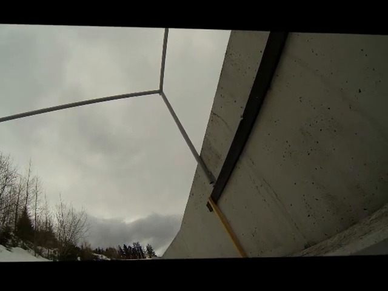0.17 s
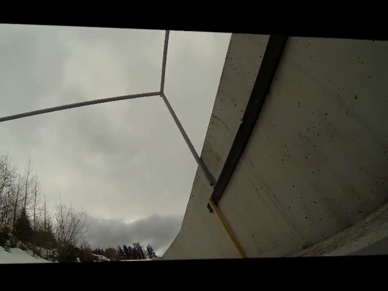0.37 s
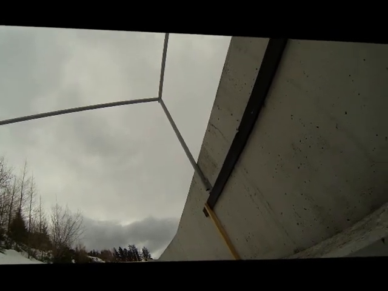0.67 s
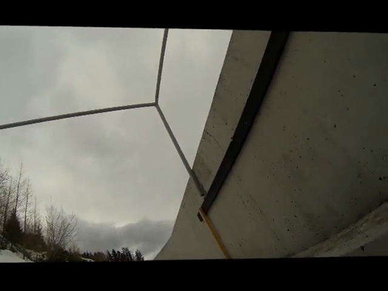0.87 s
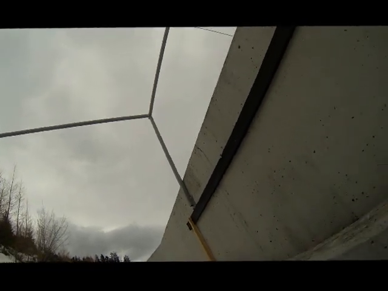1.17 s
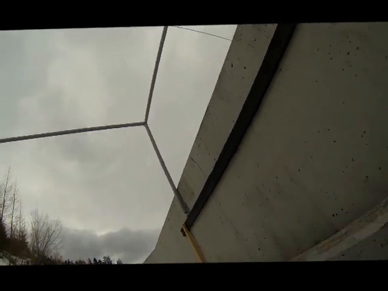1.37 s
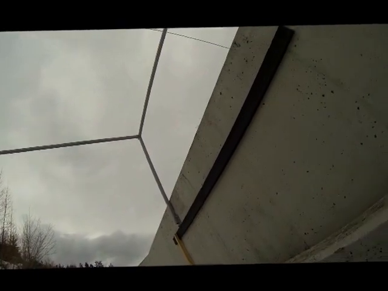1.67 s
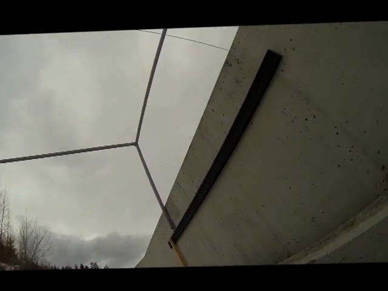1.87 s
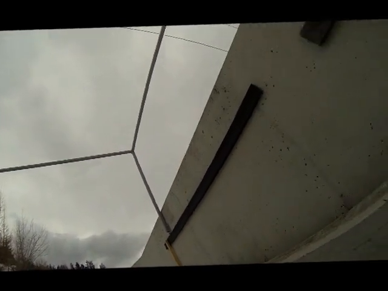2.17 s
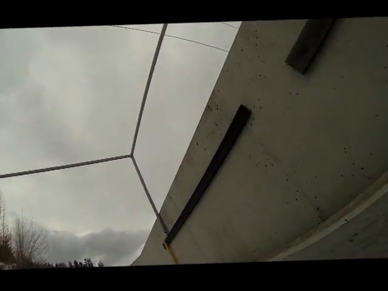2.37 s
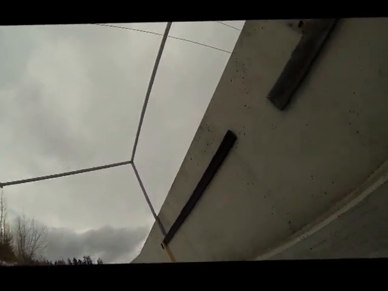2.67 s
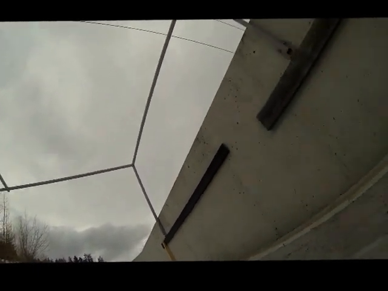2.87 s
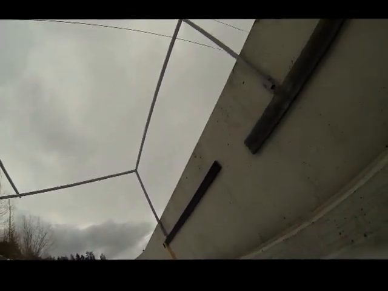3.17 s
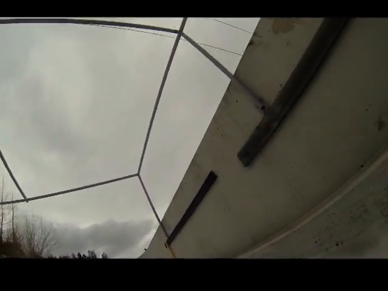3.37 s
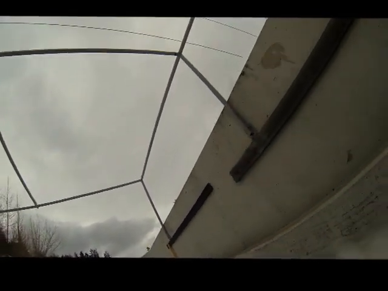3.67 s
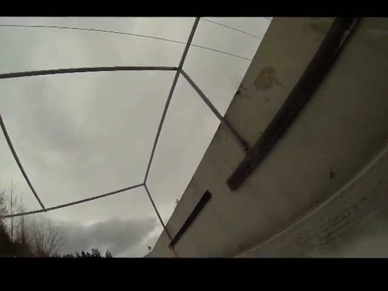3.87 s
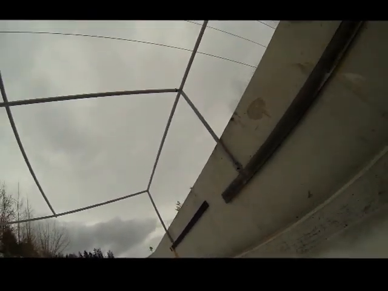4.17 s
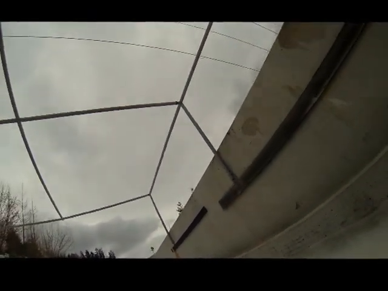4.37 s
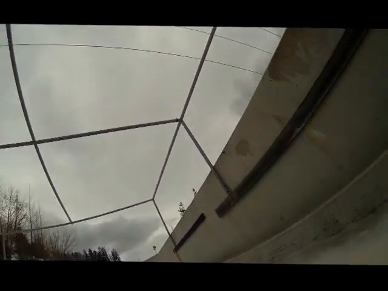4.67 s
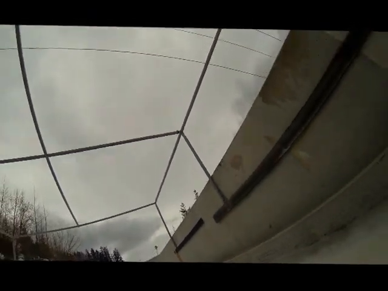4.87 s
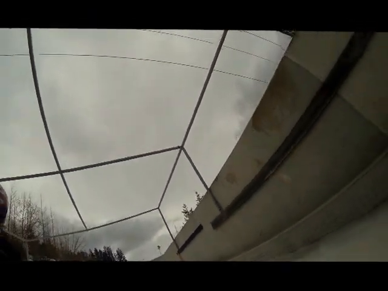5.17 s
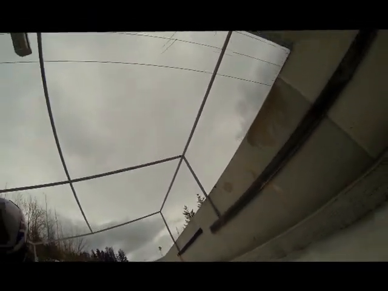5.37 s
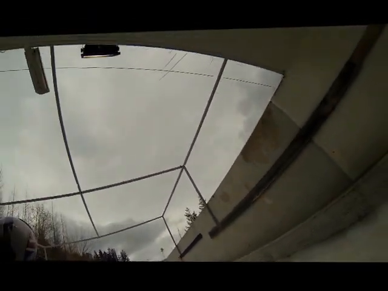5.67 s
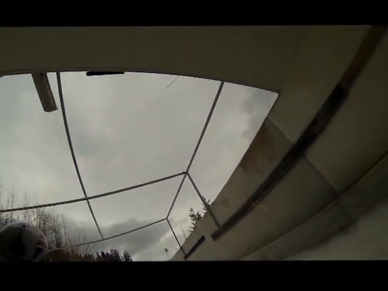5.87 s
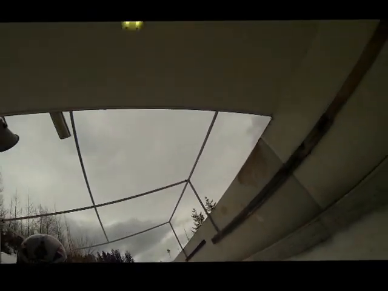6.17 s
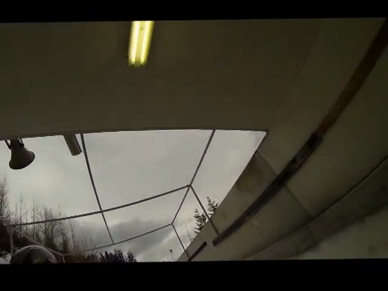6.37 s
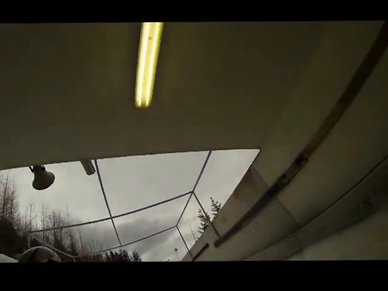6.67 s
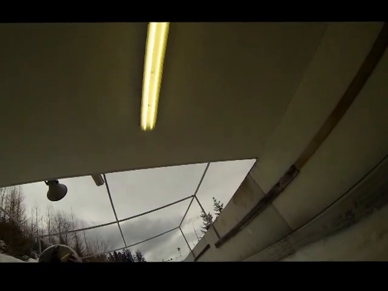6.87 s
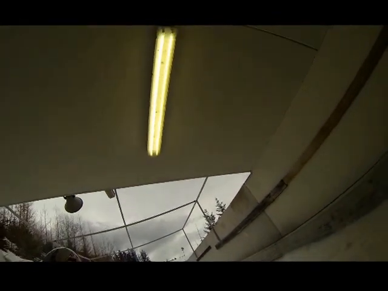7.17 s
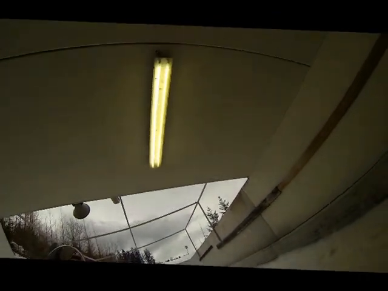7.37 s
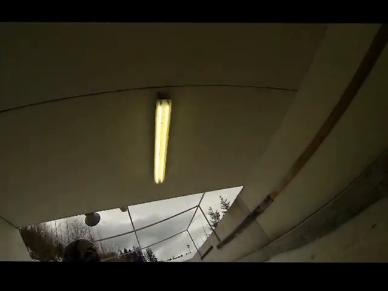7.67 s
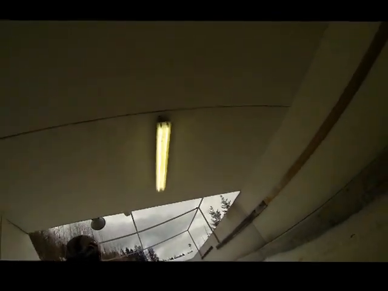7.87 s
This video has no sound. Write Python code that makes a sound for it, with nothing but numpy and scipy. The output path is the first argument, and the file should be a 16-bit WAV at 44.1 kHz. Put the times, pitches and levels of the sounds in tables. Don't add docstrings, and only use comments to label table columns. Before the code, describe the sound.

Deep shuddering rumble and hard low thumps of a speeding sled on ice, with scraping runners, clicky rattles and a faint high whine in lulls.

```python
import sys
import numpy as np
from scipy import signal
from scipy.io import wavfile
from scipy.ndimage import uniform_filter1d

SR = 44100
rng = np.random.default_rng(int(sys.argv[2]) if len(sys.argv) > 2 else 0)


def persist_wave(psi):
    counts = np.round(np.clip(psi, -1, 1) * 32767).astype(np.int16)
    wavfile.write(sys.argv[1], SR, np.atleast_2d(counts).T)


def convert_level_to_amplitude(level_db):
    exponent = np.asarray(level_db, float) / 20
    return 10 ** exponent


N = 354255
TIME = np.arange(N) / SR


def unit(x):
    return x / np.sqrt(np.mean(x ** 2))


def walk(rate):
    hold = int(SR / rate)
    levels = np.repeat(rng.standard_normal(N // hold + 1), hold)
    return unit(uniform_filter1d(uniform_filter1d(levels, hold), hold)[:N])


def body(x, modes, count=2):
    out = 0
    for k, (hz, width, db) in enumerate(modes):
        b, a = signal.iirpeak(hz, hz / width, fs=SR)
        ringing = signal.sosfilt([[*b, *a]] * count, x)
        out = out + (-1) ** k * convert_level_to_amplitude(db) * ringing / np.sqrt(width)
    return out


def steadied(x, seconds, share):
    swell = uniform_filter1d(x ** 2, int(seconds * SR)) + 1e-12
    return unit(x / swell ** (np.clip(share, 0, 1) / 2))


def grit(rate, spread_db, smooth):
    hit = rng.random(N) < rate / SR
    size = np.minimum(rng.exponential(size=N), 3.5)
    rub = rng.standard_normal(N)
    return unit(hit * convert_level_to_amplitude(spread_db * size) * np.sign(rub)) + smooth * rub


def swells(rows, rise_db_s, fall_db_s, floor_db):
    start, end, db = np.transpose(rows)[:, :, None]
    t = TIME[::128]
    lost = rise_db_s * np.maximum(start - t, 0) + fall_db_s * np.maximum(t - end, 0)
    power = convert_level_to_amplitude(2 * floor_db) + convert_level_to_amplitude(2 * (db - lost)).sum(axis=0)
    return np.interp(TIME, t, 10 * np.log10(power))


def rings(table, rise_s, fall_s):
    out = np.zeros(N)
    for s, db, hz in table:
        near = slice(max(int((s - .08) * SR), 0), int((s + .3) * SR))
        age = TIME[near] - s
        swell = np.exp(-np.where(age < 0, (age / rise_s) ** 2, age / fall_s))
        out[near] += convert_level_to_amplitude(db) * swell * np.sin(2 * np.pi * hz * age)
    return out


def strikes(table, shape):
    out = np.zeros(N)
    for s, db, *_ in table:
        out[int(s * SR)] += convert_level_to_amplitude(db)
    return signal.fftconvolve(out, shape)[:N]


# pitch in Hz, level in dB.
WHINE = [(10643, -2), (10691, -8), (10740, -19)]
# start in seconds, end in seconds, whine level in dB.
LULLS = [(0, .7, -78), (1.95, 2.35, -81), (2.8, 2.84, -90), (3.42, 3.68, -78), (3.88, 3.91, -86.5),
         (4.15, 4.18, -87), (4.45, 4.61, -83), (5.25, 5.36, -82.5), (6.0, 6.22, -84.5), (6.5, 6.63, -80),
         (6.8, 6.88, -83), (7.45, 7.58, -90), (8.0, 8.03, -99)]


def electronics():
    whine = sum(convert_level_to_amplitude(db) * np.sqrt(2) * np.sin(2 * np.pi * hz * TIME) for hz, db in WHINE)
    hiss_bands = [(7900, 3000, -1.5), (11500, 3000, -8.0), (14200, 3000, -11.5)]
    hiss = unit(body(rng.standard_normal(N), hiss_bands)) * convert_level_to_amplitude(3.0 * walk(25))
    gain_db = swells(LULLS, rise_db_s=35.5, fall_db_s=401, floor_db=-99)
    return convert_level_to_amplitude(gain_db) * (whine + convert_level_to_amplitude(2.0) * hiss)


# time in seconds, level in dB.
SWAY = [(0, -17.5), (.15, -23.5), (.4, -34), (.76, -14.5), (.96, -22), (1.59, -15.5), (1.88, -22.5),
        (2.65, -28.5), (4.0, -35.5), (4.61, -16.5), (4.83, -24), (5.05, -14), (5.39, -24.5), (5.9, -16.5),
        (6.37, -22.5), (7.1, -20), (7.42, -14), (7.52, -29)]
# time in seconds, level in dB.
BOUNCES = [(2.06, -12.5), (2.35, -15), (2.52, -18.5), (2.78, -15.5), (3.06, -15.5), (3.409, -13),
           (3.62, -13.5), (3.84, -15.5), (4.119, -16.5), (4.88, -14.5), (6.51, -16.5), (6.71, -16.5),
           (7.57, -15), (7.69, -21.5), (8.03, -21)]


def sway():
    sway_hz = 35.43 * (1 + 0.05115 * walk(7.9))
    phase = 2 * np.pi * np.cumsum(sway_hz) / SR + 1.4
    buffet = unit(body(rng.standard_normal(N), [(21.6, 25, 0.21), (48.0, 19, -1.2)]))
    sway_db = np.interp(TIME, *np.transpose(SWAY))
    bounce_db = swells([(s, s, db) for s, db in BOUNCES], rise_db_s=170.5, fall_db_s=107.5, floor_db=-58)
    return np.hypot(convert_level_to_amplitude(sway_db), convert_level_to_amplitude(bounce_db)) * (np.sqrt(2) * np.sin(phase) + convert_level_to_amplitude(-6.5) * buffet)


# pitch in Hz, width in Hz, level in dB.
RING = [(156, 10.8, -2), (168.2, 34, -12)]
LOWER_PANELS = [(69.4, 35.6, 0), (101.4, 19, -8.5), (123.1, 28.4, -0.5)]
UPPER_PANELS = [(205.6, 37, 1), (243.8, 21, -1.5), (282.5, 40, -5)]
# time in seconds, main ring in dB, lower panels in dB.
JOLTS = [(.02, -23, -21), (0.132, -17.5, -15.5), (.69, -26, -17.5), (0.941, -15, -33.5), (1.431, -28, -17),
         (1.968, -18, -14), (2.17, -11.5, -16), (2.352, -21.5, -11), (2.552, -20.5, -18.5),
         (2.838, -15.5, -12.5), (3.131, -19, -11), (3.69, -19, -12), (3.779, -23.5, -35),
         (3.909, -27, -16.5), (4.158, -17, -9.5), (4.472, -15.5, -15.5), (4.811, -20.5, -32),
         (4.899, -36.5, -21.5), (5.342, -21.5, -12.5), (5.43, -20.5, -45), (5.572, -16.5, -10),
         (5.77, -16.5, -21), (5.93, -19.5, -18.5), (6.238, -18.5, -22), (6.618, -15, -18),
         (6.8, -12.5, -22), (7.27, -20, -22), (7.561, -17, -10.5), (7.848, -14, -15), (8.03, -33, -17.5)]
# start in seconds, end in seconds, main ring in dB, lower panels in dB.
ROUGH = [(0.19, 0.387, -29, -28), (.42, 0.59, -34.5, -34.5), (0.77, 0.923, -25.5, -20.5),
         (0.988, 1.452, -24, -20.5), (1.544, 1.906, -32, -34), (2.073, 2.15, -26, -25),
         (2.58, 2.81, -23.5, -23), (3.006, 3.08, -36, -29), (3.235, 3.636, -30.5, -30),
         (3.97, 4.114, -30.5, -32.5), (4.514, 4.808, -22.5, -23.5), (4.958, 5.181, -29.5, -27.5),
         (6.016, 6.21, -21.5, -22), (6.29, 6.426, -34.5, -31), (6.658, 6.93, -28.5, -22.5),
         (6.99, 7.124, -31, -28), (7.392, 7.525, -25, -26), (7.66, 7.78, -37, -31.5)]


def hull():
    smooth_ice_db = -45
    shakes = np.array([(s, s, *db) for s, *db in JOLTS] + ROUGH)
    ring_db = swells(shakes[:, [0, 1, 2]], 330.5, 176.5, smooth_ice_db)
    lower_db = swells(shakes[:, [0, 1, 3]], 329.5, 253.5, smooth_ice_db)
    upper_db = 0.29 * ring_db + 0.43 * lower_db - 21.5
    edge_db = 1.03 * lower_db - 32
    ring = steadied(body(grit(60, 3.0, 0.43), RING), .03, 0.4)
    lower = steadied(body(grit(40, 2.2, 0.35), LOWER_PANELS), 0.051, 1.0)
    upper = steadied(body(grit(80, 4.5, 0.41), UPPER_PANELS), 0.02, 0.24)
    edge = unit(body(grit(80, 3.5, .6), [(372, 510, -2.5), (615, 990, -4.0)]))
    panels = convert_level_to_amplitude(lower_db - 2.5) * lower + convert_level_to_amplitude(upper_db) * upper
    return convert_level_to_amplitude(ring_db + 0.5) * ring + panels + convert_level_to_amplitude(edge_db) * edge


# pitch in Hz, width in Hz, level in dB.
MOUNT = [(343, 150, -1), (625, 110, -4), (800, 85, 1)]
CAVITY = [(1020, 566, -2.9), (1317, 110, -0.69), (1436, 190, -1.8), (1663, 327, 1.5)]
WALL = [(2235, 570, -2.5), (2767, 640, 1.5), (3444, 540, -4.5), (4080, 1500, -10)]
SNAP = [(4750, 1200, -2.5), (6200, 1300, -7.5), (7920, 1100, -12), (10000, 2500, -16), (13000, 2500, -25)]
# start in seconds, end in seconds, cavity level in dB,
# wall minus cavity in dB.
RUBS = [(0, -0.003, -44.5, -14), (0.124, 0.167, -43, -8.5), (0.291, 0.41, -41.5, -13),
        (0.43, 0.632, -46.5, -9.5), (0.657, 0.748, -38, -12.5), (.78, .88, -42, -12), (.9, 1.02, -48, -13),
        (1.05, 1.47, -45.5, -12.5), (1.494, 1.76, -50, -13), (1.906, 1.976, -44.5, -9),
        (2.01, 2.192, -47, -9), (2.289, 2.347, -50.5, -7.5), (2.543, 2.637, -50.5, -16),
        (2.76, 2.829, -43, -12), (3.057, 3.127, -51.5, -7.5), (3.235, 3.42, -43.5, -15),
        (3.45, 3.53, -45, -10), (3.57, 3.65, -45, -10), (3.68, 3.678, -38.5, -20), (3.87, 3.914, -45, -6.5),
        (4.129, 4.153, -38, -12.5), (4.376, 4.895, -45.5, -16.5), (4.948, 5.185, -52.5, -10),
        (5.505, 5.66, -50, -11), (5.773, 5.942, -54, -7), (6.05, 6.241, -44, -10.5),
        (6.25, 6.304, -55, -12), (6.363, 6.43, -53, -10), (6.544, 6.87, -42, -10.5),
        (6.987, 7.36, -49.5, -9.5), (7.43, 7.64, -42.5, -14), (7.68, 7.977, -52.5, -10.5),
        (8.02, 8.034, -49, -12)]


def scrape():
    rise_db_s, fall_db_s, glide_db, glide_wall_db = 159, 260.5, -60.5, -9.5
    cavity_rows = [(a, b, db) for a, b, db, _ in RUBS]
    wall_rows = [(a, b, db + rel) for a, b, db, rel in RUBS]
    cavity_db = swells(cavity_rows, rise_db_s, fall_db_s, glide_db)
    wall_db = swells(wall_rows, rise_db_s, fall_db_s, glide_db + glide_wall_db) - cavity_db
    judder_db = 2.0 * walk(40)
    chips = grit(300, 1.6, 1.0)
    ticks = grit(120, 2.8, 1.7)
    mount = convert_level_to_amplitude(-15.5 + 3.6 * walk(20)) * unit(body(chips, MOUNT))
    wander_db = 3.0 * walk(30)
    cavity = 0
    for k, mode in enumerate(CAVITY):
        cavity = cavity + (-1) ** k * convert_level_to_amplitude(np.roll(wander_db, k * SR)) * body(chips, [mode])
    wall = convert_level_to_amplitude(wall_db - 3.0 + wander_db[::-1]) * unit(body(chips + 1.3 * ticks, WALL))
    spray = convert_level_to_amplitude(wall_db - 13.0 + 2.6 * walk(15)) * unit(body(ticks, SNAP))
    air_rush = convert_level_to_amplitude(-79.5) * unit(body(ticks, WALL + SNAP))
    return convert_level_to_amplitude(cavity_db + judder_db) * (mount + unit(cavity) + wall + spray) + air_rush


# time of the top in seconds, cavity level in dB,
# wall minus cavity in dB, length in milliseconds.
SKIDS = [
    (1.969, -22, -18, 8),
    (1.99, -37.5, -24.5, 21),
    (4.371, -33.5, -7.5, 17),
    (5.372, -32.5, -18, 5.3),
    (6.482, -36, -4.5, 21.7),
]


def skids():
    rub = rng.standard_normal(N)
    cavity, wall, snap = (unit(body(rub, modes)) for modes in (CAVITY[2:], WALL, SNAP))
    out = np.zeros(N)
    for s, db, wall_db, ms in SKIDS:
        near = slice(int((s - .1) * SR), int((s + 0.11) * SR))
        age = (TIME[near] - s) * 1000 / ms
        swell = np.exp(-np.where(age < 0, (1.24 * age) ** 2, age))
        bright = wall[near] + convert_level_to_amplitude(-14.0) * snap[near]
        out[near] += convert_level_to_amplitude(db) * swell * (cavity[near] + convert_level_to_amplitude(wall_db) * bright)
    return out


# start in seconds, end in seconds, level in dB.
BITES = [(.03, .19, -60), (.275, .405, -51), (.428, .452, -47), (.8, .87, -60), (1.895, 1.945, -51),
         (2.255, 2.3, -59), (2.705, 2.748, -54), (2.77, 2.848, -55), (3.37, 3.43, -49), (3.443, 3.47, -48),
         (3.485, 3.53, -45), (3.56, 3.6, -54), (3.612, 3.648, -50), (4.35, 4.39, -53), (6.445, 6.5, -54),
         (7.53, 7.545, -52)]


def bites():
    spray = grit(900, 2.5, .8)
    wall = convert_level_to_amplitude(2.5 * walk(60)) * unit(body(spray, WALL))
    snap = convert_level_to_amplitude(2.0 * walk(45)) * unit(body(spray, SNAP))
    level_db = swells(BITES, rise_db_s=900, fall_db_s=1500, floor_db=-99)
    return convert_level_to_amplitude(level_db) * (wall + convert_level_to_amplitude(-10) * snap)


# time of the top in seconds, peak level in dB, pitch in Hz. Mostly
# large panels swung by ruts; the rows near 258 and 273 Hz are small panels.
LUMPS = [(0.978, -18.5, 110.4), (1.13, -13, 78.3), (1.56, -19, 116.2), (2.08, -15, 114.5),
         (2.62, -10, 125.8), (3.139, -11.5, 113.4), (3.93, -20, 108), (4.145, -10, 114.7),
         (4.622, -13, 129.4), (3.3, -31.5, 273), (7.002, -15.5, 163.2), (7.01, -31, 257.7),
         (7.091, -30, 147)]
NUDGES = [(.03, -29, 250), (.17, -27, 245), (.284, -28, 262), (.349, -33, 275), (.484, -33, 275),
          (1.22, -25, 245), (1.35, -27, 240), (3.063, -41, 300), (3.18, -25, 240), (3.243, -28, 250),
          (3.327, -30, 238), (4.37, -37, 250), (6.1, -26, 240), (7.393, -27, 250)]
JERKS = [(2.55, -27, 350), (2.844, -32, 430), (3.115, -28, 320), (3.911, -24, 344), (4.466, -30, 380),
         (6.214, -29, 410), (6.815, -38, 425), (6.879, -32, 375), (7.56, -28, 450), (7.852, -34, 394)]
BRACKET_TAPS = [(.03, -40, 790), (.281, -35, 800), (.335, -41, 800), (.39, -43, 520), (.7, -36, 790),
                (1.096, -42, 560), (1.125, -40, 800), (1.194, -44, 560), (1.215, -43, 1030),
                (1.287, -45, 580), (1.748, -43, 1080), (1.967, -41, 770), (2.101, -43, 800),
                (2.332, -39, 800), (2.359, -41, 820), (2.538, -44, 690), (3.58, -43, 800),
                (3.691, -42, 600), (4.164, -36, 780), (5.349, -38, 560), (5.564, -42, 830),
                (5.915, -42, 790), (6.094, -42, 800), (6.211, -35, 790), (6.217, -38, 1140),
                (6.37, -43, 810), (6.621, -38, 1090), (6.663, -42, 970), (6.735, -41, 810),
                (6.777, -41, 630), (6.813, -41, 800), (7.0, -43, 620), (7.2, -44, 600), (7.387, -28, 780)]
CASE_TAPS = [(.276, -26, 1600), (1.445, -35, 1490), (1.747, -33, 1500), (1.9, -34, 1610),
             (1.966, -13.5, 1690), (1.98, -30, 2050), (1.999, -33, 1610), (2.355, -29, 1580),
             (2.746, -34, 1610), (2.778, -33, 1420), (2.792, -33, 1690), (3.332, -34, 1630),
             (3.348, -34, 1420), (3.396, -36, 1700), (3.524, -35, 1550), (3.654, -36, 1830),
             (3.68, -32, 1390), (3.911, -38, 1750), (4.372, -27, 1610), (5.372, -25, 2800),
             (5.373, -23, 1280), (5.378, -28, 2750), (5.378, -37, 4800), (5.378, -21, 1720),
             (5.882, -35, 1630), (5.916, -26, 1410), (6.07, -31, 1300), (6.214, -34, 1700),
             (6.495, -36, 1860), (6.62, -30, 1600), (6.687, -35, 1560), (6.729, -32, 1300),
             (6.751, -29, 1310), (6.797, -35, 1280), (7.362, -32, 1360), (7.386, -20, 1360),
             (7.424, -27, 1700), (7.444, -25, 1560), (7.634, -29, 1600)]


def lumps():
    panels = rings(LUMPS, .016, .035) + rings(NUDGES, .012, .022)
    mount = rings(JERKS, .0018, .0035)
    bracket = convert_level_to_amplitude(-1.5) * rings(BRACKET_TAPS, .004, .009)
    case = convert_level_to_amplitude(-2.5) * rings(CASE_TAPS, .0015, .006)
    return panels + mount + bracket + case


# time in seconds, peak level in dB, wall minus peak in dB,
# chatter in milliseconds.
KNOCKS = [(0.0246, -27.5, -15, 7), (0.2735, -16.5, -13, 6.1), (0.6877, -29, -14.5, 20),
          (1.1252, -22, -30, 6.8), (2.0477, -24.5, -14.5, 2.2), (2.1594, -28.5, -12.5, 3.3),
          (2.3525, -18, -14.5, 3.1), (2.7046, -31, -9.5, 7.5), (2.7418, -29, -6, 4.1),
          (2.773, -32, -27, 38), (3.111, -21, -15.5, 9.5), (3.6501, -22.5, -27, 5.4),
          (4.1414, -28, -28, 5.7), (5.3472, -18.5, -18.5, 4.2), (5.3690, -15, -17, 8.7),
          (5.9128, -23, -12, 5.4), (6.1821, -25.5, -27.5, 4.8), (6.4718, -27.5, -2.5, 2.9),
          (6.616, -18, -14, 3.3), (6.7476, -32, -30, 5.6), (7.2509, -35.5, -7, 5), (7.3255, -37.5, -6, 18),
          (7.3826, -9, -21.5, 5.2), (7.4196, -11.5, -35, 2.4), (7.44, -16, -20, 7),
          (7.5344, -25.5, -11, 4.3), (7.5763, -20.5, -12.5, 6.9), (7.6003, -25, -9, 3.3),
          (7.6306, -20, -20, 11.5), (7.8481, -45, 6, 2.7)]
# time in seconds, peak level in dB.
RATTLES = [(0.093, -34.5), (0.226, -32), (0.332, -25.5), (1.405, -30.5), (1.4407, -32), (1.669, -31.5),
           (1.7451, -28.5), (2.09, -24), (2.3245, -25.5), (2.649, -28), (3.6084, -26.5), (4.292, -37),
           (4.4957, -28), (5.183, -33.5), (5.54, -34), (5.8047, -30.5), (5.88, -30), (6.0672, -28.5),
           (6.998, -30.5), (7.3586, -30), (7.5623, -17.5)]


def knocks():
    rattle_wall_db, rattle_ms = -19.5, 6.8
    age = np.arange(int(.06 * SR)) / SR
    onset = 1 - np.exp(-age / 0.00038)
    hits = KNOCKS + [(s, db, rattle_wall_db, rattle_ms) for s, db in RATTLES]
    drive = np.zeros((3, N + len(age)))
    for s, db, wall_db, ms in hits:
        i = int(s * SR)
        chatter = rng.standard_normal(len(age))
        parts = [(0, 1), (wall_db + 7.0, .7), (wall_db - 10.5, .45)]
        for row, (rel_db, share) in enumerate(parts):
            fade = np.exp(-age / (max(ms, .3) * share / 1000))
            drive[row, i:i + len(age)] += convert_level_to_amplitude(db + rel_db) * chatter * onset * fade
    cavity, wall, snap = drive[:, :N]
    low = body(cavity, CAVITY) + convert_level_to_amplitude(-10.5) * body(cavity, MOUNT)
    return convert_level_to_amplitude(34.5) * (low + body(wall, WALL) + convert_level_to_amplitude(1) * body(snap, SNAP))


# pitch in Hz, width in Hz, level in dB.
FRAME = [(3200, 2200, 2), (5240, 2200, 1), (7700, 2200, -3), (11500, 3500, -9)]
# time in seconds, peak level in dB.
TICKS = [(.108, -54), (.121, -53), (.2728, -44), (.7772, -50), (.81, -56), (.834, -50), (.851, -53),
         (.861, -49), (.926, -54), (.9388, -50), (.961, -54), (.9842, -48), (.9922, -45), (1.0096, -41),
         (1.013, -43),
         (1.0538, -45), (1.0575, -47), (1.0803, -41), (1.1217, -46), (1.1336, -44), (1.1561, -44),
              (1.161, -49), (1.166, -48), (1.182, -50), (1.193, -46), (1.21, -49), (1.221, -49),
              (1.301, -51), (1.4494, -53), (1.5766, -49), (1.9657, -46), (2.0462, -51), (2.1603, -52),
              (2.1733, -48), (2.3259, -46), (2.3526, -44), (2.3603, -41), (2.5479, -43), (2.6115, -53),
              (2.6512, -53), (2.7036, -52), (2.741, -48), (2.8218, -50), (2.8368, -46), (2.845, -47),
              (3.1061, -48), (3.1535, -51), (3.6913, -38), (3.8949, -47), (3.9088, -39), (4.1333, -50),
              (4.1617, -45), (4.1917, -47),
         (4.4636, -46), (4.474, -52), (4.5184, -47), (4.5474, -49), (4.592, -54), (4.6107, -49),
              (4.6197, -48), (4.628, -47), (4.638, -52), (4.696, -55), (4.8676, -50), (4.8941, -49),
              (5.2054, -51), (5.349, -43), (5.364, -52), (5.3825, -43), (5.386, -42), (5.389, -43),
              (5.58, -52), (5.6316, -52), (5.9282, -45), (6.0081, -53), (6.2051, -49), (6.2206, -47),
              (6.6246, -45), (6.635, -52), (6.641, -50), (6.699, -49), (6.762, -50), (6.8137, -46),
              (6.8756, -43), (6.8803, -45), (7.143, -50), (7.258, -51), (7.3, -52), (7.342, -50),
              (7.4438, -43), (7.448, -46), (7.557, -43), (7.577, -41), (7.5994, -44), (7.613, -48),
              (7.8484, -47)]


def frame_ticks():
    age = np.arange(int(0.027 * SR)) / SR
    fade = (1 - np.exp(-age / .0003)) * np.exp(-age / .0012)
    drive = np.zeros(N)
    for s, db in TICKS:
        i = int(s * SR)
        drive[i:i + len(age)] += convert_level_to_amplitude(db) * rng.standard_normal(len(age)) * fade
    return convert_level_to_amplitude(42) * body(drive, FRAME)


def contact(age):
    return np.exp(-((age - .0003) / .00007) ** 2)


# pitch in Hz, width in Hz, level in dB.
CRACK = [(686, 890, -5.5), (1600, 860, 0), (2470, 660, 4), (3450, 350, 1.5), (4840, 520, -5),
         (6240, 650, -14.5), (8070, 1000, -13)]


def loud_crack():
    age = np.arange(int(0.027 * SR)) / SR
    crack = body(contact(age), CRACK, count=1)
    shudder = rng.standard_normal(len(age)) * np.exp(-age / 0.0018)
    crack = crack / np.abs(crack).max() + convert_level_to_amplitude(21) * body(shudder, CAVITY + WALL + SNAP[:1])
    return strikes([(1.0294, 1.5)], crack)


# time in seconds, peak level in dB, pitch in Hz.
LIFTS = [(0.122, -5.5, 144), (1.02, -14.5, 139), (2.163, -27, 152), (2.84, -9, 140), (3.116, -10.5, 136),
         (3.693, -2, 125), (3.914, -5.5, 121), (4.621, -10, 139), (5.351, 1.5, 136.5), (5.384, -4, 130.5),
         (6.214, -3.5, 140), (6.88, -4, 125), (7.256, -12, 134.5), (7.577, -6.5, 112), (7.849, -26, 131)]
DROPS = [(0.86, -13.5, 142), (0.928, -19, 154), (1.029, -6, 113), (1.965, -11.5, 147), (2.3542, -5, 143),
         (2.362, -4, 141), (2.55, -1, 119), (3.9087, -2, 131), (3.938, -12, 139), (4.163, -1, 156),
         (4.466, -8.5, 160), (4.687, -10.5, 144), (5.928, -8.5, 120.5), (6.62, -8, 156), (6.761, -4.5, 156),
         (7.558, -5, 157), (8.026, -9.5, 87)]


def bump_edges():
    age = np.arange(int(0.027 * SR)) / SR
    jolt = np.convolve(body(contact(age), MOUNT, count=1), np.hanning(30))
    return convert_level_to_amplitude(-14.0) * strikes(LIFTS + DROPS, jolt)


def thumps():
    out = np.zeros(N)
    for direction, table in ((0.83, LIFTS), (-1.01, DROPS)):
        for s, db, hz in table:
            near = slice(int((s - .03) * SR), int((s + .05) * SR))
            cycles = (TIME[near] - s) * hz
            shape = np.exp(-(cycles / np.where(cycles < 0, .4, .6)) ** 2)
            out[near] += direction * convert_level_to_amplitude(db) * shape * np.cos(2 * np.pi * cycles)
    return out


def scene():
    ice = scrape() + skids() + bites()
    parts = knocks() + frame_ticks() + loud_crack() + bump_edges()
    low = sway() + hull() + lumps() + thumps()
    return (electronics() + ice + parts + low)[None]


def roll_off(x):
    return signal.sosfilt(signal.butter(12, 15800, fs=SR, output="sos"), x)


def record(dry):
    dull = signal.sosfilt(signal.butter(1, 14000, fs=SR, output="sos"), dry)
    return roll_off(np.clip(dull, -1, 1))


dry = scene()
out = record(dry)
persist_wave(out)
```